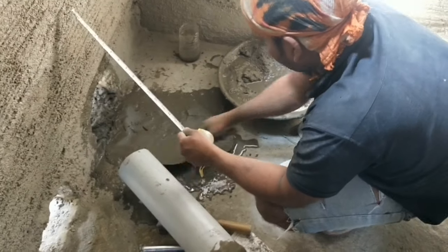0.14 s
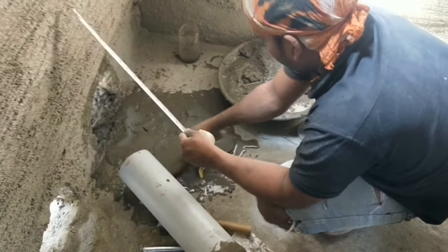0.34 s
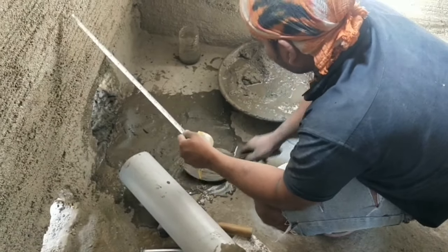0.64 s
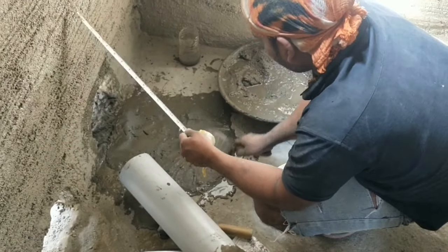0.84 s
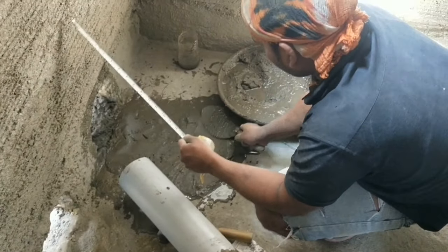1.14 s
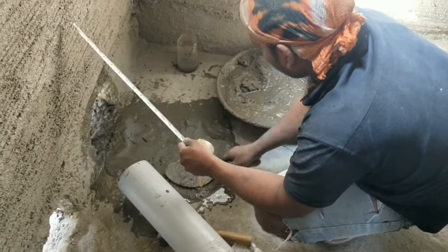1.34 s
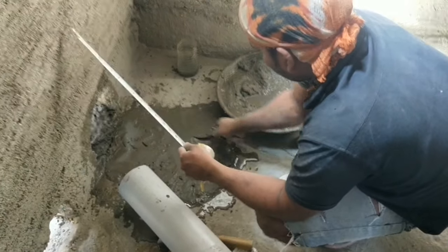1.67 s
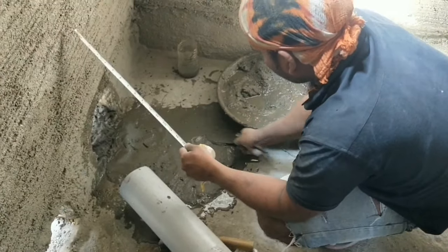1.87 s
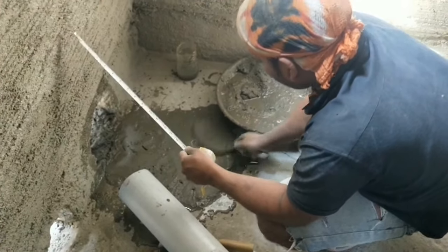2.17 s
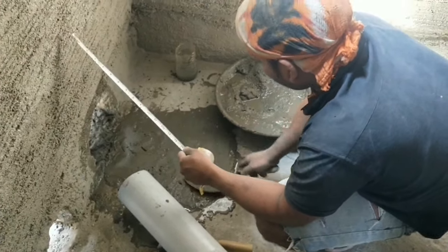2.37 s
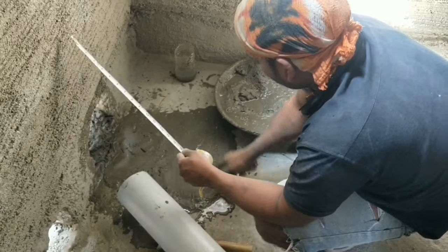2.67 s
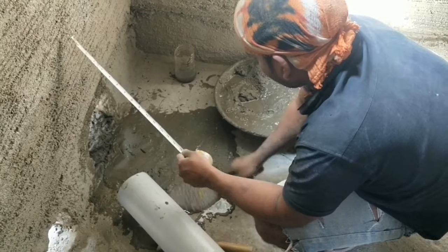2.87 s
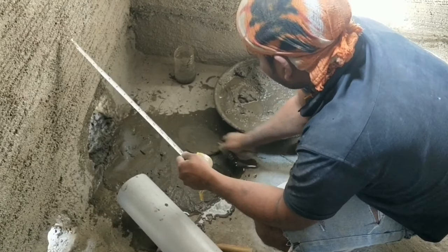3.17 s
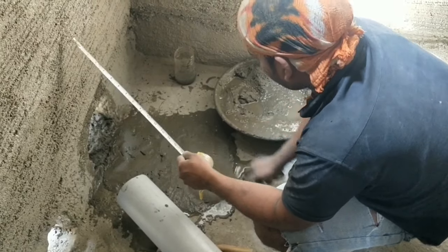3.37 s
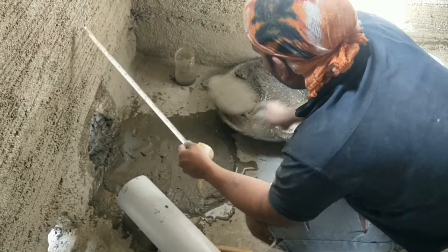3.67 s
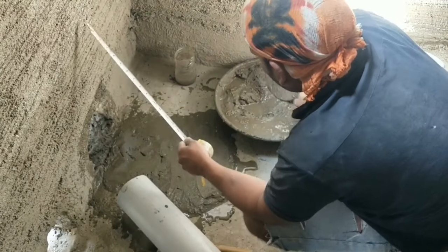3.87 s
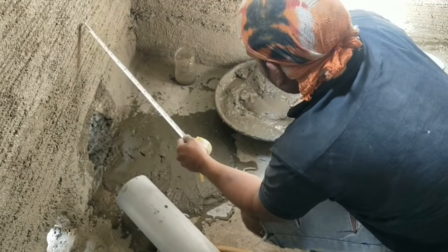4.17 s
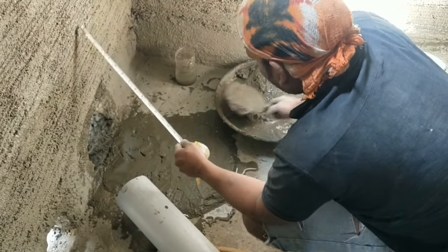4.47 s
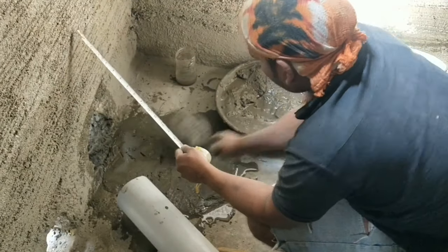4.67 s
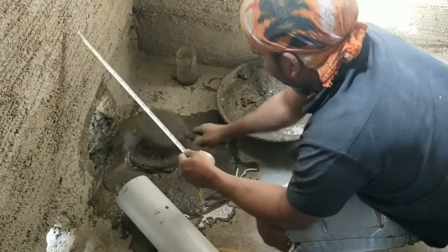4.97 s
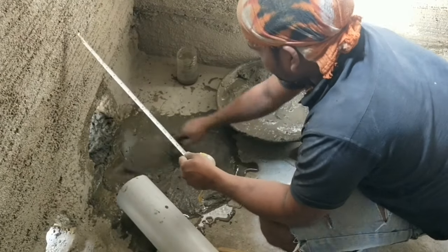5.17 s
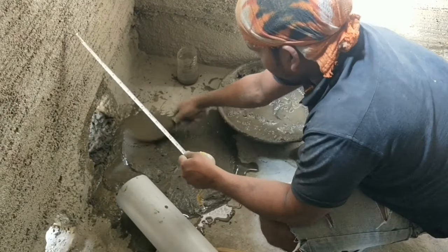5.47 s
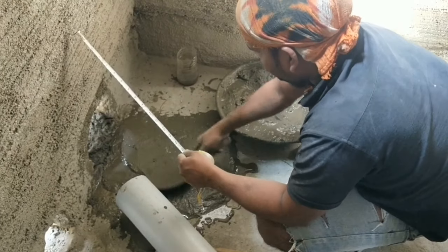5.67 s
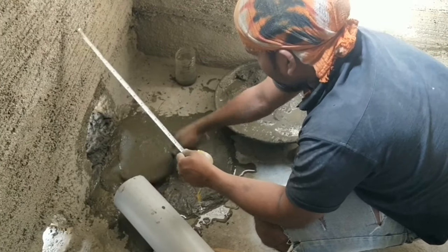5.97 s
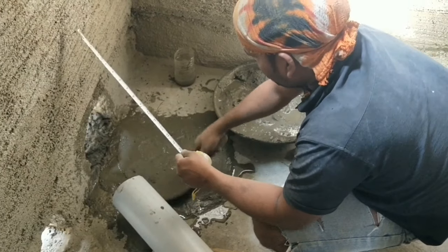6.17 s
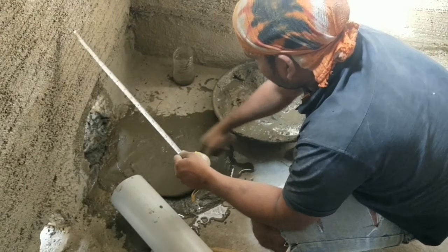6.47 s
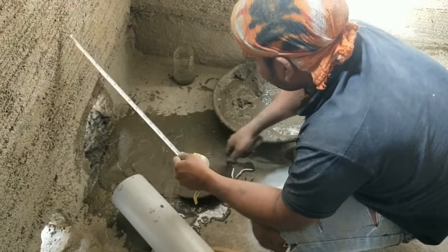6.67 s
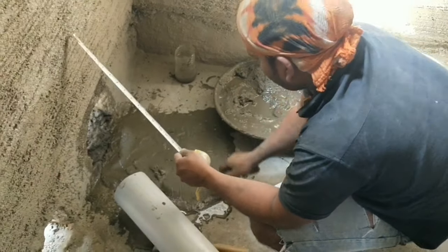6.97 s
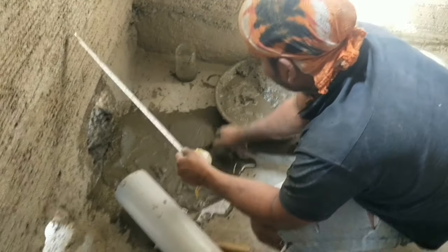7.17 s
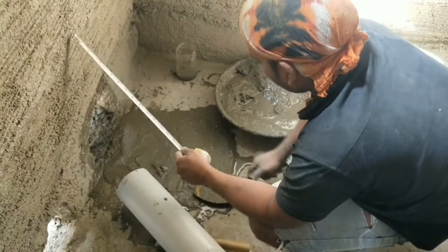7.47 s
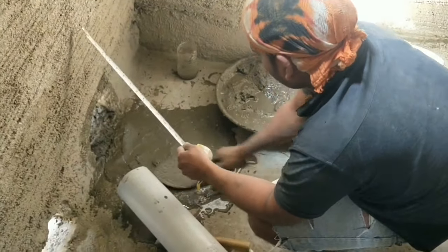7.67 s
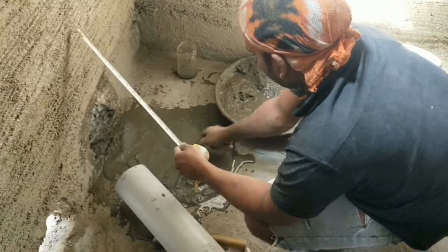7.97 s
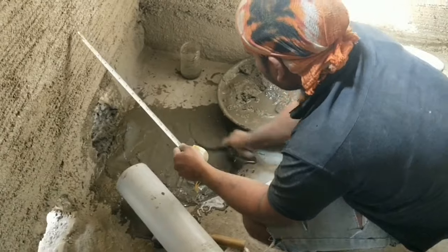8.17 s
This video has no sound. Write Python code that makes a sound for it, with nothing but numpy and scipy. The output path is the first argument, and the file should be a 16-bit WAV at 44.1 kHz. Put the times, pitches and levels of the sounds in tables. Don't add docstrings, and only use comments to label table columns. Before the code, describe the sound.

In a small bare room, close stereo microphones hear a steel trowel working wet, sandy mortar. A short scrape opens, then a stronger gritty drag at 0.4-0.65 s. Light touches follow around 0.8-1.2 s. Sharp grain bites at 1.45 s lead into rough strokes until 2 s, more short scrapes to 2.9 s, and a dense, bright run from 3 to 3.5 s. From 3.9 to 4.7 s it is sparse: faint rasps and wet peeling. Firm scrapes return at 4.8-5.7 s, again at 6-6.7 s with a crisp bite near 6.1 s. After a lull, strokes resume at 7.05-7.5 s, including a thin blade ring at 7.25 s; another pause, then busy scraping from 7.9 s to the end. Throughout, soft low pipe hoots pulse on the left about three times a second above faint vehicle rumble and room air.

```python
import sys
import numpy as np
from scipy import signal
from scipy.fft import rfft, irfft, next_fast_len
from scipy.io import wavfile
from scipy.ndimage import uniform_filter1d, map_coordinates

SR = 44100
rng = np.random.default_rng(int(sys.argv[2]) if len(sys.argv) > 2 else 0)


def invert_db(x):
    u = np.asarray(x, float) / 20
    return 10 ** u


def output_pcm(signal):
    pcm = np.clip(np.atleast_2d(signal).T, -1, 1) * 32767
    wavfile.write(sys.argv[1], SR, np.round(pcm).astype(np.int16))


N = 367231

# [t/s, hold/s, grit level/dB, flex of steel/dB, weight on
# slab/dB]
LANDINGS = [(0.0, .02, -54, 1, -1), (0.385, .07, -38, 3, -1), (0.837, .03, -62, -39, -28),
            (.952, .07, -56, -14, -17), (1.071, .035, -60, -3, -20), (1.165, .055, -67.5, -24, -25),
            (1.433, .015, -37, -26, -40), (2.157, 0.044, -49, 0, -2), (2.256, 0.097, -46, -10, -27),
            (2.479, 0.017, -52, -22, -24), (2.638, .03, -46.5, -16, -40), (2.672, 0.017, -34, -17, -28),
            (2.979, 0.1, -39.5, -4.5, -13), (3.403, 0.095, -43.5, -5.5, -18.5),
            (3.922, 0.056, -54.5, -21, -24), (4.461, .045, -60.5, -16, -23), (4.59, 0.02, -49, -7, -19),
            (4.81, 0.046, -52.5, -9.5, -5), (5.19, .055, -48, 3, -4), (5.368, 0.047, -47, 0.5, -2),
            (5.515, 0.054, -49, -5.5, -30), (5.994, .065, -47, 0, -5), (6.404, .045, -61, -10, -12),
            (7.883, 0.14, -48, -5.5, -28),
            (6.458, .035, -47, -3, -18),
    (7.055, .035, -56, -11, -24),
    (7.353, .1, -43, 1, -14),
    (4.795, .02, -72, -6, 4),
    (1.612, .04, -48, -6, -8),
    (4.556, .02, -62, -25, -25),
    (5.865, .11, -80, 17, 21),
    (6.6, .08, -49, -3, -12),
    (1.99, .075, -47, -3, -10),
]
# [t/s, hold/s, grit level/dB, flex/dB, weight/dB]
LEANS = [(.05, .015, -60, 3, 4.5), (.48, .03, -44, 1, -7), (.54, .035, -38, 0, 3), (.63, .02, -55, 2, 3),
         (0.88, .06, -55, -26, -28), (1.463, 0.017, -34.5, -8.5, -44), (1.54, .06, -48.5, -3.5, -30),
         (1.66, .06, -41, -3, -6), (1.76, .06, -46, 0, -1), (1.84, 0.13, -44, -4, -2),
         (2.386, 0.017, -42.5, -13.5, -23), (2.42, .03, -56, -2, -21), (2.78, .02, -43, 2, -3),
         (2.815, .02, -37, -5, -10), (2.7, .05, -47, -8, -7), (3.098, .13, -41, -5, -14),
         (3.26, .07, -41.5, -9, -9), (3.36, .04, -53.5, -9, -19), (3.998, 0.021, -41.5, -20.5, -42),
         (4.05, .04, -51, 3, -6), (4.13, .115, -54, -8, -22), (.12, .06, -82, 11, 5),
         (4.89, 0.02, -62, -14, -22), (5.61, .04, -45, 3, 4), (5.69, .06, -50, 1, 0),
         (6.072, .05, -42, -2, -4), (6.15, .085, -47, -1, -6.5), (5.26, .09, -53, -2, -4),
              (6.53, .04, -48, -5.5, -30), (6.69, .03, -55, 5, -5), (6.76, .06, -76, 6, 0),
              (6.845, .09, -82, -12, -8), (7.0, .05, -71, 2, -22), (7.1, .07, -47, -1, 1),
              (7.2, .02, -53, -4, -14), (7.28, .02, -59, -6, -8), (7.41, .03, -46, 4, -12),
              (7.49, 0.046, -52, -7.5, -27), (8.02, .07, -46.5, 0.5, -9), (8.09, .045, -46, 2, -3),
              (8.165, 0.03, -52, 1, -2), (8.235, 0.06, -39, 2.5, -4), (8.21, .02, -44, 2, -12),
              (8.31, .03, -51, -1, -13), (2.765, .02, -44, 0, -12), (4.52, .02, -66, -4, -12),
              (3.31, .025, -41, -6, -18), (7.72, .08, -84, 0, 0), (4.93, .025, -64, -14, -22)]
# [t/s, peak level/dB]
CATCHES = [(0.385, -26.5), (0.5392, -39), (0.839, -43), (0.9524, -31), (1.075, -39), (1.441, -16),
           (1.469, -17), (2.155, -53), (2.2566, -32), (2.485, -30), (2.6387, -27.5), (2.6723, -26),
           (2.9792, -18.5), (3.096, -19.5), (3.1802, -21), (3.239, -23.5), (3.3039, -28), (3.4055, -29.5),
           (4.595, -39.5), (5.388, -30), (5.5169, -46), (5.6264, -35), (5.9968, -45), (6.0684, -27),
           (6.086, -24.5), (6.4073, -44), (6.462, -27), (7.0546, -36), (7.3522, -39), (7.8855, -34),
           (2.18, -36), (6.615, -33), (6.652, -31), (8.122, -30), (1.925, -31), (4.826, -40)]
# [t/s, peak level/dB]
STONES = [(.542, -27), (1.447, -24), (1.699, -32), (1.925, -36), (2.837, -28), (2.997, -28), (3.313, -30),
          (3.999, -37), (4.044, -38), (4.092, -39), (4.603, -42), (4.834, -44), (5.221, -37), (5.392, -30),
          (5.628, -26), (6.071, -28), (6.089, -22), (6.171, -33), (6.472, -33), (6.619, -38), (6.665, -38),
          (8.134, -34), (8.226, -24), (8.272, -28), (8.292, -28)]
# [t/s, f/Hz, rms level/dB, length/s]
SINGING_MODES = [(.42, 1160, -43, 0.046), (0.52, 1700, -46, 0.072), (.985, 1800, -60, .045),
                 (.955, 1400, -64, .015), (1.105, 2000, -56, 0.033), (1.108, 2470, -60, .04),
                 (5.87, 1300, -63.5, 0.054), (5.903, 1600, -59.5, 0.041), (3.26, 2950, -45, .08),
                 (2.81, 1810, -39, 0.041), (1.928, 790, -50, 0.062), (2.82, 670, -58.5, 0.05),
                 (2.19, 1600, -47, .04), (1.52, 1560, -49, .065), (3.02, 1160, -53.5, 0.057),
                 (4.093, 740, -48, 0.039), (4.845, 1257, -53, 0.027), (5.42, 807, -41, .04),
                 (5.636, 650, -57.5, 0.058), (6.083, 1800, -35, 0.018), (6.1, 1180, -44.5, 0.056),
                 (6.673, 746, -63, 0.069), (6.821, 597, -65.5, 0.12), (7.18, 554, -57.5, 0.0761),
                 (7.26, 550, -58, 0.0796), (2.997, 2080, -39, .025), (0.016, 1150, -59, 0.018),
                 (7.444, 886, -57.5, 0.084), (5.63, 1000, -52, 0.0402), (8.04, 2200, -53, 0.0507),
                 (8.119, 990, -57, 0.075), (8.218, 2400, -41, .016), (8.115, 1160, -51, .03),
                 (7.12, 1200, -48, .03), (6.42, 3200, -60, .025), (5.21, 2200, -48, .03),
                 (5.3, 1350, -54, .035), (4.19, 1250, -64, .015), (7.64, 1050, -69, .03),
                 (1.72, 2650, -47, .02), (5.63, 1800, -45, .025), (.41, 1750, -46, .03),
                 (8.25, 1500, -42, .025), (2.695, 1300, -50, .03), (5.9, 2350, -64, .04)]
# [t/s, f/Hz, rms level/dB, length/s]
LIFTED_RINGS = [
    (4.91, 3070, -67, .07),
    (5.1, 3110, -72, .07),
    (4.93, 3400, -72, .05),
    (5.07, 3400, -77, .04),
    (5.13, 3750, -82, .04),
    (7.02, 3200, -66, .04),
    (7.265, 2910, -51, .085),
    (7.255, 3370, -55, .075),
    (7.72, 3030, -79, .1),
    (7.825, 3030, -70, .055),
]
# [t/s, hold/s, level/dB]
PEELS = [
    (.12, .03, -77),
    (1.03, .06, -66),
    (1.13, .1, -68),
    (2.1, .04, -73),
    (3.93, .04, -56),
    (4.27, .07, -69),
    (4.465, .03, -66),
    (4.56, .02, -69),
    (4.67, .03, -70),
    (6.87, .03, -77),
]
# [f/Hz, density/dB per Hz]
GRIT_SPECTRUM = [(2060, -43), (3500, -12.5), (3830, -11), (4600, -3.5), (4810, -3.5), (5410, 0.5),
                 (8850, -21), (12600, -22.5), (15200, -15), (16200, -28.5), (16500, -53.5)]
# [f/Hz, width/Hz, level/dB]
TIP_MODES = [(2503, 350, -3), (2927, 280, -0.5), (3313, 760, -4)]
# [f/Hz, width/Hz, level/dB]
BLADE_MODES = [(1433, 340, -2.5), (1797, 290, 1), (2120, 390, 0)]
# [f/Hz, width/Hz, level/dB]
SLAB_MODES = [(840.4, 141, -7), (882, 90, -3.5), (1180, 107, 0.5)]
# [f/Hz, T60/s]
WALL_DECAY = [(500, 0.095), (3000, 0.085), (10000, 0.036)]
# [f/Hz, left over right/dB]
SIDEWAYS = [(600, 0), (1500, 1), (2800, 2), (5500, 4), (10000, 3), (14000, 0)]
# [f/Hz, density/dB per Hz]
AIR_SPECTRUM = [(300, 17.5), (420, 2.5), (630, -5.5), (1000, -13.5), (2000, -22), (3200, -29), (4000, -35),
                (5200, -25), (6500, -33), (8500, -31.5), (12000, -33), (16000, -53)]
# [t/s, hold/s, level/dB]
PUFFS = [(0.064, .16, -59), (.39, 0.16, -57), (0.635, 0.033, -57), (0.787, 0.018, -56.5),
         (1.027, 0.11, -52.5), (1.317, .04, -56.5), (1.53, 0.15, -58), (1.883, 0.13, -52.5),
         (2.238, 0.11, -53.5), (2.558, .12, -55), (2.85, .14, -57.5), (3.14, 0.063, -53.5),
         (3.413, 0.16, -50.5), (3.81, .22, -55), (4.161, 0.067, -53.5), (4.517, .04, -61),
         (4.68, 0.068, -59), (5.008, 0.054, -60), (7.09, .02, -57), (5.637, 0.059, -51.5),
         (5.888, 0.045, -60.5), (6.122, 0.018, -53.5), (6.214, .06, -58), (6.48, 0.026, -51.5),
         (6.734, 0.042, -56.5), (7.33, .03, -52), (7.585, .03, -59.5), (7.82, .12, -53), (8.05, .02, -62),
         (8.162, 0.064, -53)]
# [f/Hz, width/Hz, level/dB]
PIPE_MODES = [(279.9, 19.6, 6.5), (329.8, 40, -0.5), (246, 40, -4.5), (620, 40, -30.5)]
# [t/s, hold/s, deep level/dB, drone level/dB]
PASSES = [(1.22, .15, -65, -75), (1.6, .13, -62, -48), (1.8, .28, -62, -61), (2.2, .2, -66, -63),
          (3.08, .44, -61, -64), (3.76, .06, -63, -65), (4.06, .2, -65, -75), (4.46, .6, -69, -78),
          (5.72, .04, -63, -58), (6.0, .55, -74, -76), (8.1, .2, -59, -64)]
# [f/Hz, density/dB per Hz]
DEEP_SPECTRUM = [(12, -19), (20, -4.5), (38, 5.5), (65, -8), (75, -4), (98, -29.5), (160, -120)]
# [f/Hz, density/dB per Hz]
DRONE_SPECTRUM = [(38, -37.5), (65, -11), (103, -2), (129, -4), (162, -3), (199, -16), (215, -12),
                  (280, -29.5), (470, -120)]
# [f/Hz, share of local power under which a band is silent]
THINNING = [(700, 0), (1400, .08), (2500, .12), (3300, .13), (3900, .3), (5500, .18), (7000, .45),
            (9000, .8), (12000, .72), (15870, .72), (15920, 99)]


def unit(x):
    return x / np.sqrt(np.mean(x ** 2) + 1e-20)


def along(points, hz):
    f, value = np.transpose(points)
    return np.interp(np.log(hz + 1), np.log(f + 1), value)


def wobble(rate):
    knots = rng.standard_normal(int(N * rate / SR) + 4)
    return map_coordinates(knots, [np.arange(N) * rate / SR])


def filtered(x, response):
    m = next_fast_len(N + SR // 2)
    return irfft(rfft(x, m) * response(np.fft.rfftfreq(m, 1 / SR)), m)[..., :N]


def below(hz, order):
    return lambda f: 1 / (1 + (f / hz) ** order)


def above(hz, order):
    return lambda f: 1 / (1 + (hz / (f + 1)) ** order)


def modes(table):
    def response(f):
        total = 0
        for k, (centre, width, db) in enumerate(table):
            resonator = 1j * f * width / (centre * centre - f * f + 1j * f * width)
            total = total + (-1) ** k * invert_db(db) * resonator
        return total
    return response


def pair(alike):
    a, b = rng.standard_normal((2, N))
    turn = np.arccos(np.clip(alike, -1, 1)) / 2
    return np.array([np.cos(turn) * a + np.sin(turn) * b, np.cos(turn) * a - np.sin(turn) * b])


def swells(start, hold, db, rise, sag, fall, opens=None, settle=1):
    grid = np.arange(0, N / SR + .01, 1 / 1000)
    t = grid - np.c_[start]
    held_db = np.minimum(np.c_[rise] * t, -sag * t)
    fallen_db = fall * np.maximum(t - np.c_[hold], 0)
    power = invert_db(2 * (np.c_[db] + held_db - fallen_db))
    if opens is not None:
        power = power * np.clip((grid - np.c_[opens]) / settle, 0, 1) ** 2
    return np.interp(np.arange(N) / SR, grid, np.sqrt(np.sum(power, axis=0)))


def effort():
    landings = LANDINGS
    landed = np.sort([row[0] for row in landings])
    s, hold, grit_db, flex_db, weight_db = np.transpose(landings + LEANS)
    latest = np.maximum(np.searchsorted(landed, s, side="right") - 1, 0)
    opens = landed[latest] - .003
    tip_db = 0.79 * flex_db - 1.5
    parts = [(0 * s, 323, .007), (tip_db, 290, .012), (flex_db, 275, .018), (weight_db, 261, .028)]
    return [swells(s, hold, grit_db + over_db, rise=450 + 0 * s, sag=22, fall=fall, opens=opens, settle=settle)
            for over_db, fall, settle in parts]


def sand(rate, spread_db, paste, alike):
    struck = rng.random(N) < rate / SR
    sizes = struck * invert_db(spread_db * rng.exponential(size=N))
    return (unit(sizes) + paste) * pair(alike)


def patchy(x, depth_db):
    z = signal.stft(x, nperseg=512)[2]
    field = uniform_filter1d(rng.standard_normal(z.shape[-2:]), size=3, axis=0)
    field = uniform_filter1d(field, size=9, axis=1)
    return signal.istft(z * invert_db(depth_db * unit(field)), nperseg=512)[1][..., :N]


def grit_noise(paste, alike, depth_db, edge):
    jolts = patchy(sand(6000, 1.4, paste, alike), depth_db)
    return unit(filtered(jolts, lambda f: invert_db(along(GRIT_SPECTRUM, f)) * edge(f)))


def resonant_part(table, grains, depth_db, lo_hz, hi_hz):
    response = modes(table)
    jolts = patchy(grains, depth_db)
    return unit(filtered(jolts, lambda f: response(f) * above(lo_hz, 12)(f) * below(hi_hz, 8)(f)))


def impacts(table, db, t60, onset):
    t = np.arange(SR // 10) / SR
    shape = invert_db(db - 60 * t / t60) * (1 - np.exp(-t / onset))
    out = np.zeros(N + SR)
    for s, peak_db in table:
        i = round(s * SR)
        out[i:i + len(t)] += invert_db(peak_db) * shape
    return out[:N]


def singing(table, uneven_db, wander):
    out, uneven, drift = np.zeros(N + SR), invert_db(uneven_db * wobble(70)), wobble(140)
    for s, hz, db, length in table:
        t = np.arange(round(2 * length * SR)) / SR
        i = max(round((s - length) * SR), 0)
        at = slice(i, i + len(t))
        tone = np.sin(2 * np.pi * hz * t + wander * hz / 900 * drift[at])
        envelope = np.sin(np.pi * t / (2 * length)) ** .5
        out[at] += invert_db(db) * envelope * unit(uneven[at]) * tone
    return out[:N]


def walls(x, wet_db):
    out, step = np.pad(x, ((0, 0), (0, SR))), SR // 4
    for at in range(0, N, step):
        hz, t, z = signal.stft(rng.standard_normal((2, SR // 6)), SR, nperseg=256)
        decay = invert_db(-60 * t / along(WALL_DECAY, hz)[:, None])
        tail = signal.istft(z * decay, SR, nperseg=256)[1]
        echo = signal.fftconvolve(x[:, at:at + step], tail / np.linalg.norm(tail[0]), axes=1)
        out[:, at:at + echo.shape[1]] += invert_db(wet_db) * echo
    return out[:, :N]


def trowel():
    grit, tip_gain, blade_gain, slab_gain = effort()
    judder_db = 1.23 * wobble(35) + 1.14 * wobble(110)
    hiss = grit_noise(paste=0.7, alike=0.07, depth_db=2.5, edge=below(8300, 12))
    fizz = grit_noise(paste=0.9, alike=0.05, depth_db=3, edge=above(8300, 12))
    tip = resonant_part(TIP_MODES, sand(4000, 1.8, paste=0.53, alike=0.05), 3.7, 2190, 3900)
    blade = resonant_part(BLADE_MODES, sand(4000, 1.8, paste=.6, alike=-0.1), 3.7, 1373, 2800)
    slab = resonant_part(SLAB_MODES, sand(2500, 1.7, paste=0.5, alike=-0.1), 5.5, 470, 2100)
    steel = invert_db(-1.66) * tip_gain * tip + invert_db(-1.44) * blade_gain * blade
    drag = grit * hiss + steel + invert_db(-3.0) * slab_gain * slab

    level = grit * invert_db(judder_db - 0.7)
    level += impacts(CATCHES, db=-14, t60=0.078, onset=0.005)
    level += impacts(STONES, db=-10, t60=0.012, onset=0.0003)
    body = level / (grit + 1e-7) * drag
    peel = swells(*np.transpose(PEELS), rise=500, sag=30, fall=200)
    paste = invert_db(-17) * level ** .87 + peel
    tones = invert_db(2) * singing(SINGING_MODES, uneven_db=4.5, wander=.8)
    tones += singing(LIFTED_RINGS, uneven_db=2.2, wander=.15)
    return walls(body + paste * fizz + tones * [[.95], [.75]], wet_db=-4)


def room_air():
    low = below(900, 4)
    colour = lambda f: invert_db(along(AIR_SPECTRUM, f)) * above(380, 6)(f)
    bass = filtered(pair(0.51), lambda f: colour(f) * low(f))
    treble = filtered(pair(-0.15), lambda f: 1.35 * colour(f) * (1 - low(f)))
    return invert_db(-67.5 + 1.3 * wobble(4)) * unit(bass + treble)


def pipe():
    response = modes(PIPE_MODES)
    column = lambda f: response(f) * above(190, 4)(f) * below(700, 4)(f)
    hoot = unit(filtered(rng.standard_normal(N), column))
    puffs = swells(*np.transpose(PUFFS), rise=298.5, sag=35.5, fall=200) + invert_db(-74)
    return puffs * hoot * invert_db([[4.5], [-8.5]])


def traffic():
    s, hold, deep_db, drone_db = np.transpose(PASSES)
    deep_gain = swells(s, hold, deep_db, rise=400, sag=6, fall=120) + invert_db(-71)
    drone_gain = swells(s, hold, drone_db, rise=400, sag=6, fall=120) + invert_db(-69)
    deep = unit(filtered(pair(0.98), lambda f: invert_db(along(DEEP_SPECTRUM, f))))
    drone = unit(filtered(pair(0.87), lambda f: invert_db(along(DRONE_SPECTRUM, f))))
    deep = deep_gain * deep * invert_db([[1.2], [-1.2]])
    return deep + drone_gain * invert_db(2.5 * wobble(12)) * drone * invert_db([[2.5], [-3.5]])


def scene():
    near = filtered(trowel(), lambda f: invert_db(along(SIDEWAYS, f) * [[.5], [-.5]]))
    return near + room_air() + pipe() + traffic()


def thinned(x):
    hz, _, z = signal.stft(x, SR, nperseg=2048)
    power = np.mean(np.abs(z) ** 2, axis=0, keepdims=True)
    narrow = uniform_filter1d(power, size=7, axis=1)
    broad = 1.25 * uniform_filter1d(np.sqrt(power), size=50, axis=1) ** 2
    audible = narrow > along(THINNING, hz)[:, None] * broad
    return signal.istft(z * audible, SR, nperseg=2048)[1][:, :N]


def top_cut(x):
    return signal.sosfilt(signal.butter(12, 16940, fs=SR, output="sos"), x)


def record(dry):
    mix = thinned(dry)
    return top_cut(mix)


dry = scene()
out = record(dry)
output_pcm(out)
```